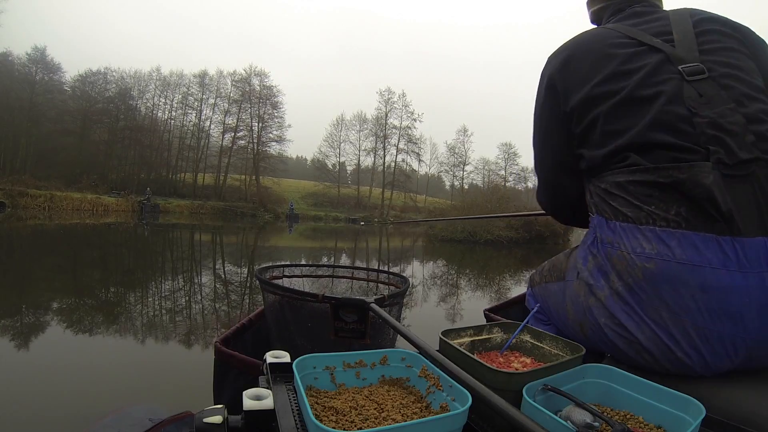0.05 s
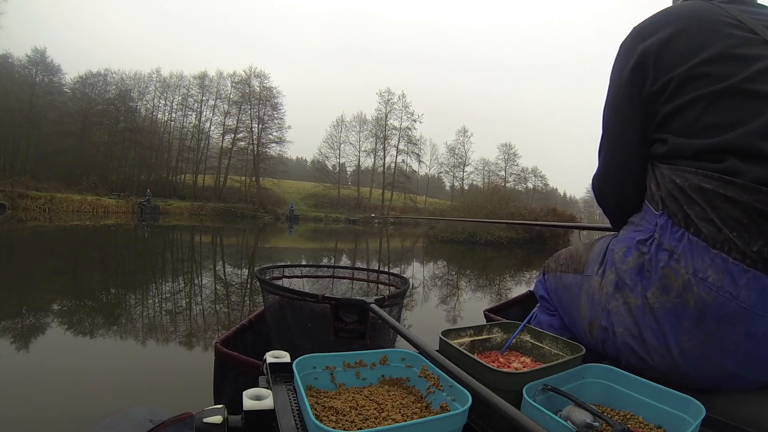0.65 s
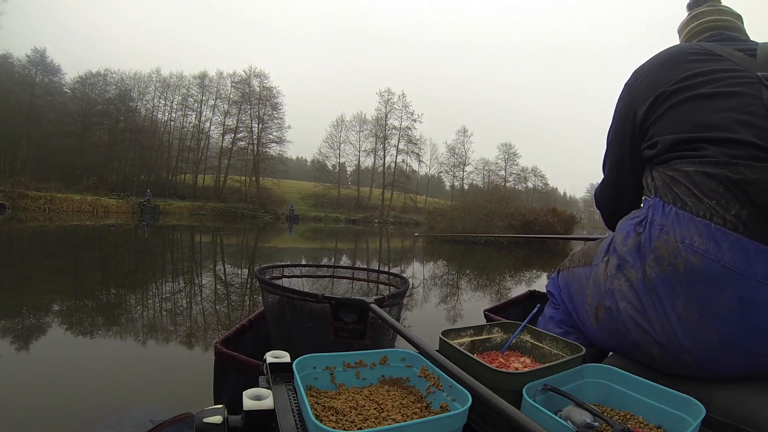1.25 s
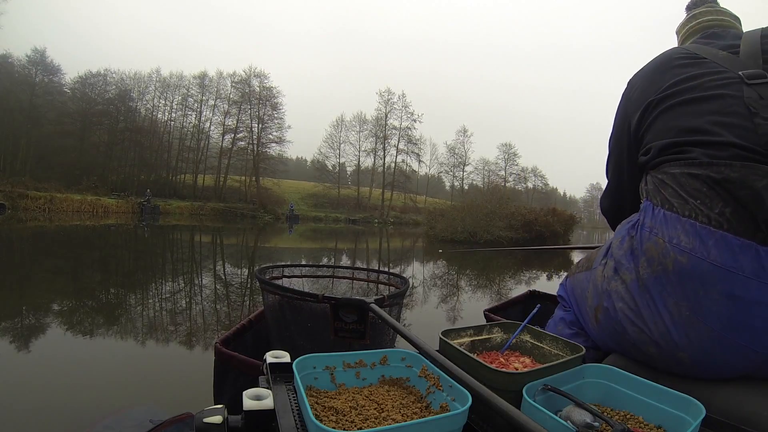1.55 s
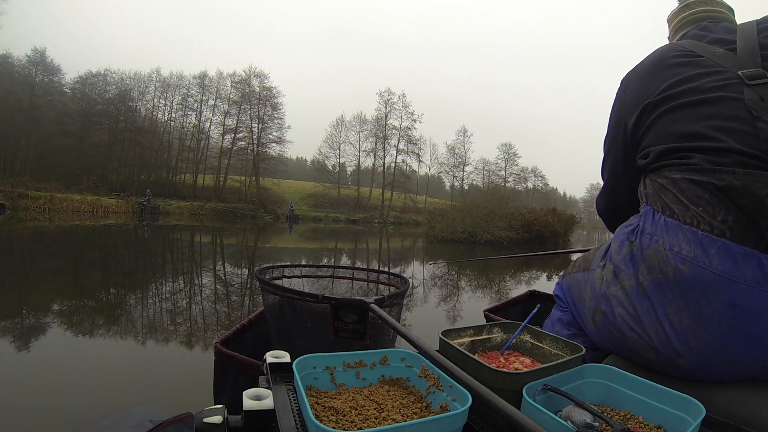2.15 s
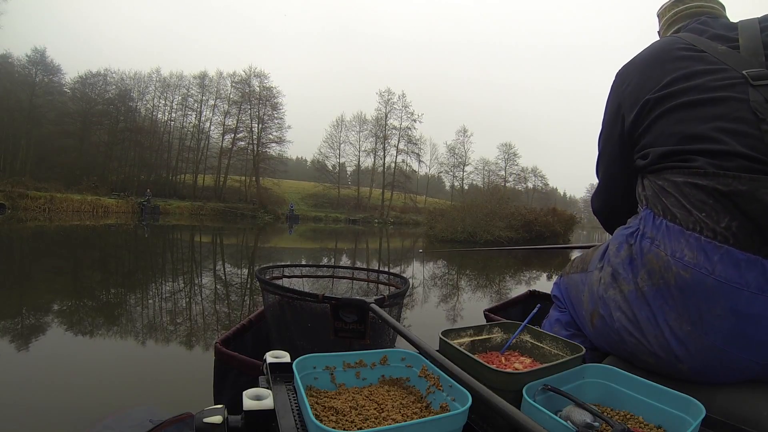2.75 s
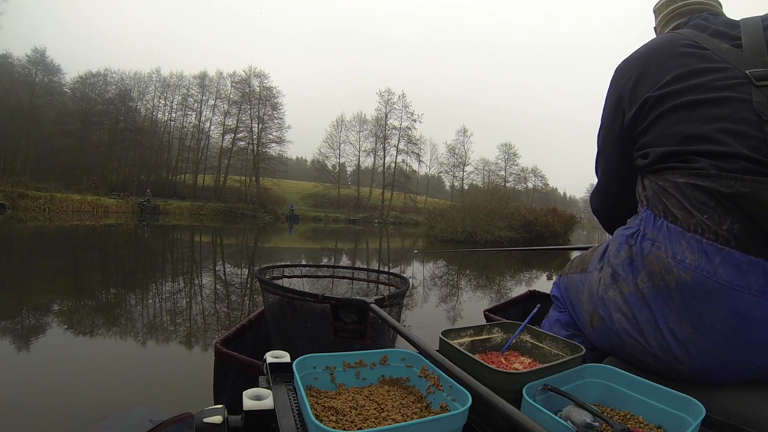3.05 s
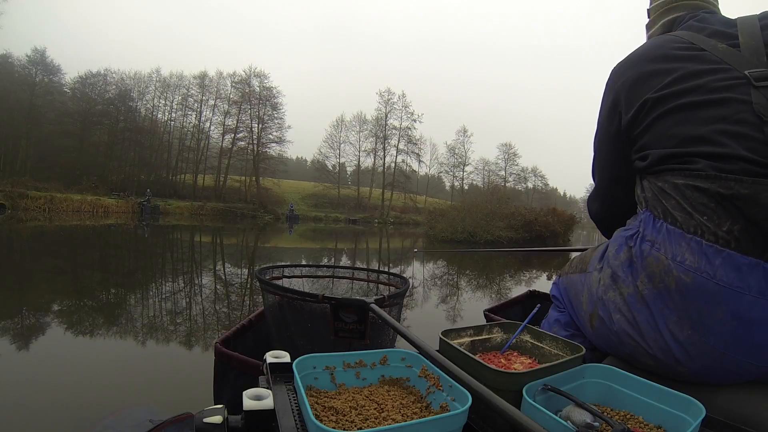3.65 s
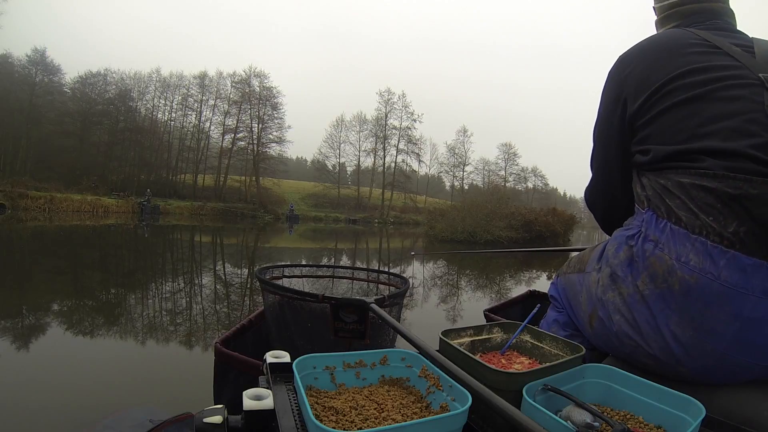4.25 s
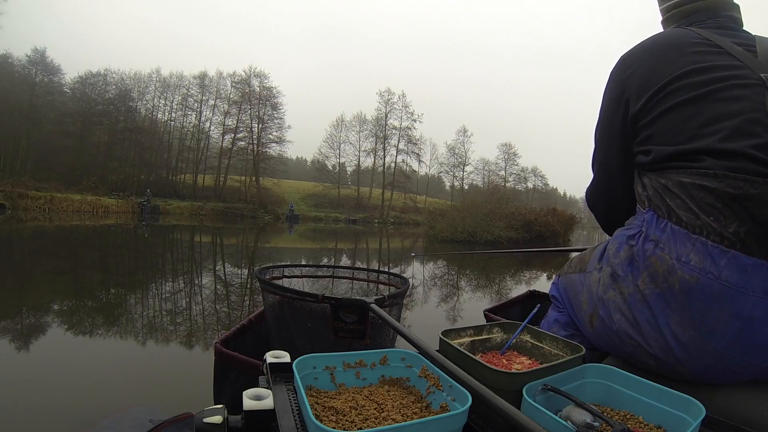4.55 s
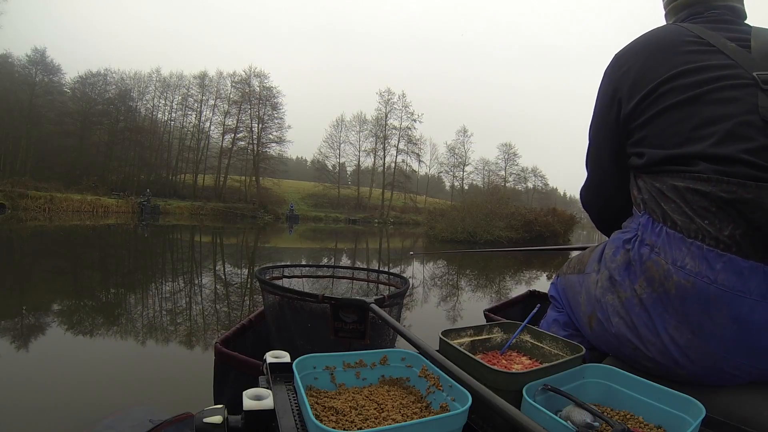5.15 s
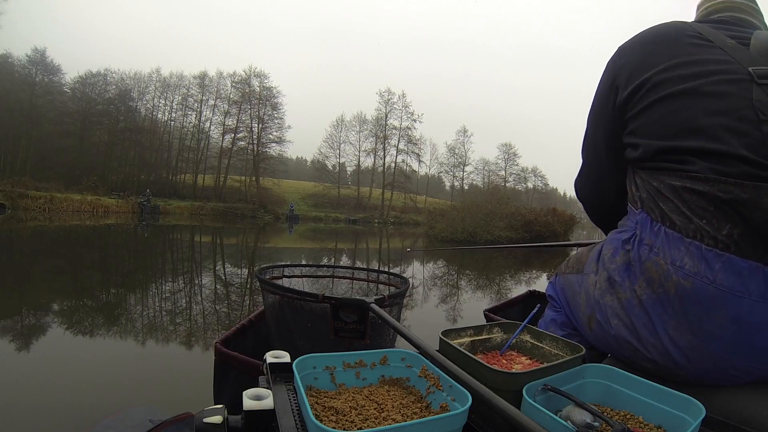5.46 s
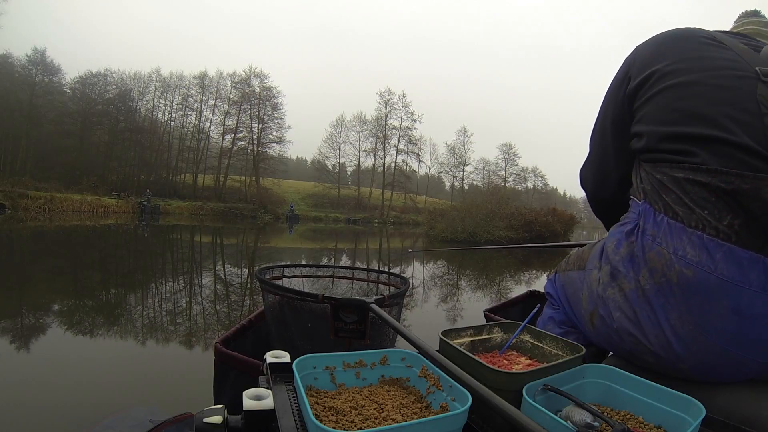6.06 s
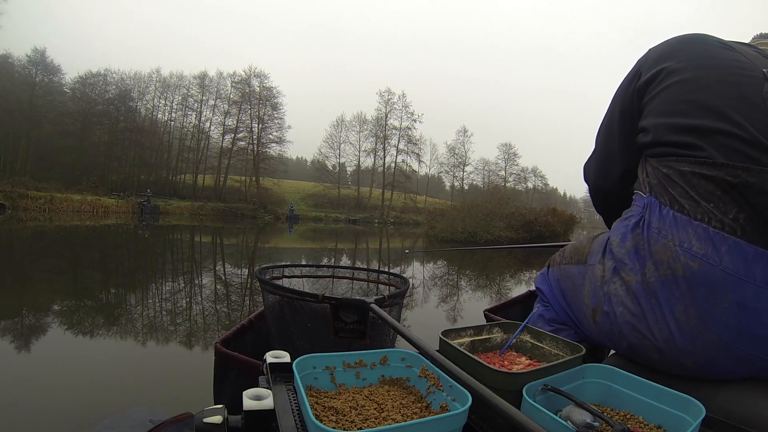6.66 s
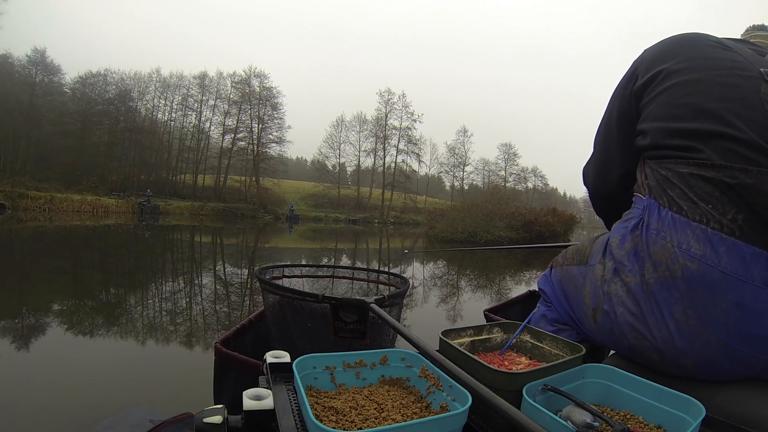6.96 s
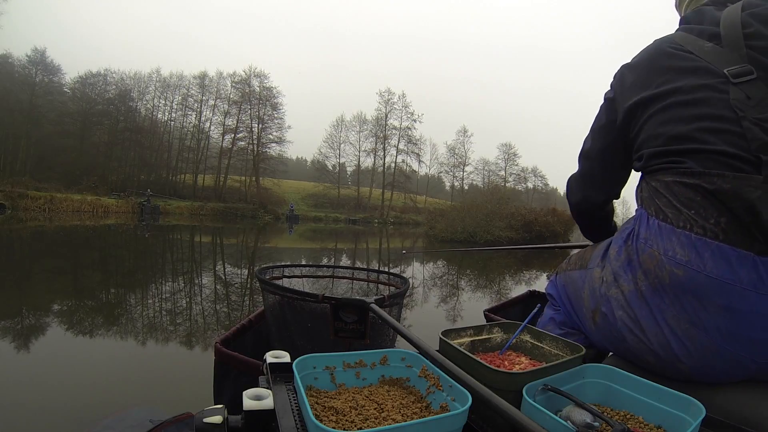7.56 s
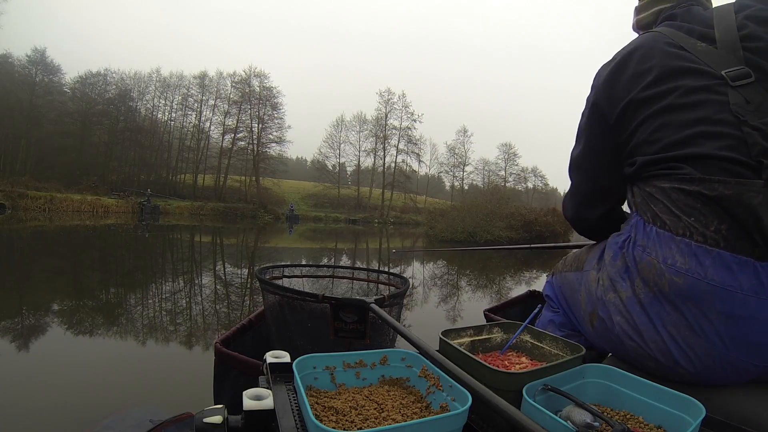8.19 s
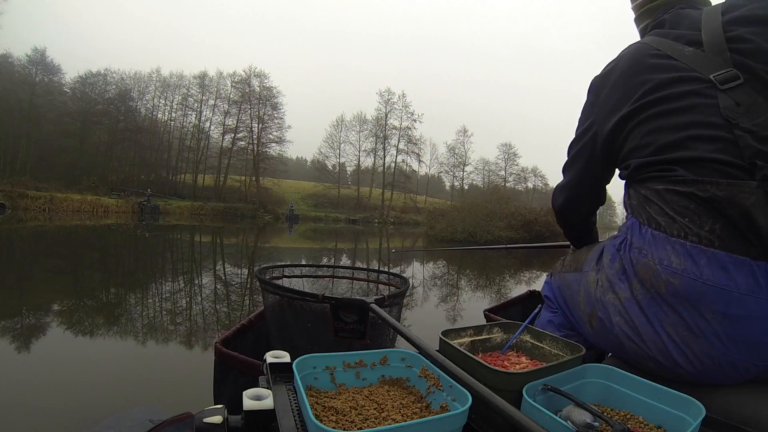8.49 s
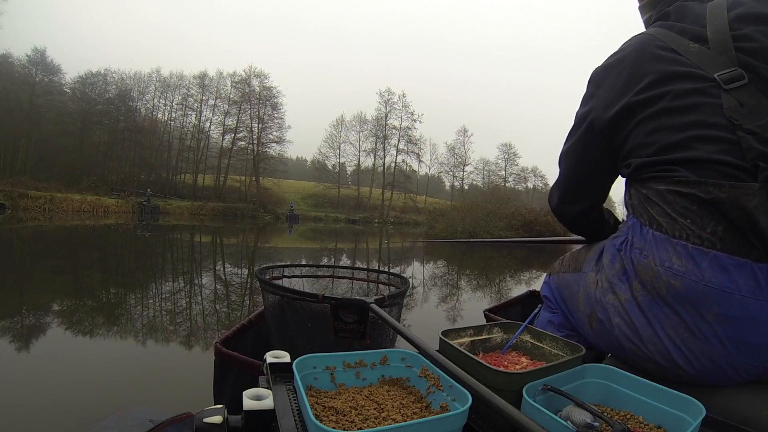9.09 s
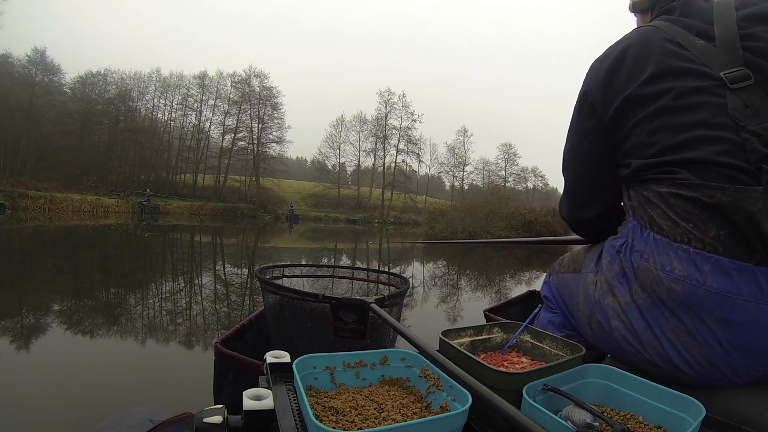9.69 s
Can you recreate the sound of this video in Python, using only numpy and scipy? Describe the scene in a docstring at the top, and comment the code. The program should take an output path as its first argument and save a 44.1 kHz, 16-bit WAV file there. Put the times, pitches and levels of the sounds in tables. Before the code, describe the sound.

A fishing seatbox booms, knocks and creaks as a long carbon pole rubs and clacks through the hands, over faint hiss.

```python
"""A seatbox booms, knocks and creaks under an angler who feeds a long carbon pole through his hands.
Its frame is a mass on springy legs and its trays are damped resonators, driven by his weight and by bumps.
Friction and impact excite the modes of the hollow pole: it rubs, its sections clack and a joint ticks.
A sleeve swishes over faint hiss. The microphone is fixed to the box, beside a still lake with no echo."""
import sys
import numpy as np
from scipy import signal
from scipy.fft import rfft, irfft, next_fast_len
from scipy.io import wavfile
from scipy.ndimage import uniform_filter1d

SR = 44100
rng = np.random.default_rng(int(sys.argv[2]) if len(sys.argv) > 2 else 0)


def store_wav(level_fs):
    """Save 16-bit WAV to argv[1]."""
    pcm = np.round(np.clip(np.atleast_2d(level_fs), -1, 1) * 32767)
    wavfile.write(sys.argv[1], SR, pcm.T.astype(np.int16))


N = 433490
TIME = np.arange(N) / SR
BLOW_TIME = TIME[:SR // 2]

# modes of the trays, the tube and its joint: (frequency [Hz], relative level [dB], T60 [s])
TRAY_MODES = [(116.2, -28.5, 0.66), (151.4, -14, 0.27), (184.2, -8, 0.25), (205.7, -9.5, 0.32),
              (256, -6.5, 0.3), (299.2, -0.5, 0.12), (330.7, 1.5, 0.1), (366.6, 2, 0.052),
              (457, 5.5, 0.0073), (533, -14.5, 0.11), (629.2, -16.5, 0.19), (697, -32, 0.39)]
TUBE_MODES = [(906, -10, 0.11), (1140, -4, 0.055), (1205, -11, 0.057), (1389, -3.5, 0.087),
              (1433, -4.5, 0.073), (1543, 3.5, 0.057), (1676, 0, 0.045), (1735, -1.5, 0.062),
              (1828, -12, 0.18), (1896, -16.5, 0.069), (2140, -7, 0.034), (2460, -8, 0.0088),
              (2650, -26.5, 0.021), (2810, -23.5, .02)]
JOINT_MODES = [(1663, 15.5, 0.0046), (1852, 5, 0.037), (2243, -11.5, 0.044), (2480, -5, 0.0063),
               (2598, 2.5, 0.039), (2750, -0.5, 0.026), (2910, -2.5, 0.012)]
# his shifting weight: (time [s], relative sway level [dB], relative creak level [dB])
WEIGHT_SHIFTS = [(0.0, -27, -46), (0.24, -44, -50), (0.76, -41, -51.5), (1.12, -39, -48),
                 (2.14, -49.5, -59.5), (2.54, -59, -75.5), (3.59, -65, -75), (4.16, -53.5, -72),
                 (4.35, -32, -59), (4.73, -46, -54), (4.9, -35, -54.5), (5.64, -42, -47.5),
                 (5.86, -47, -60.5), (6.41, -50, -59.5), (6.92, -35, -47.5), (7.42, -45, -64),
                 (8.08, -56.5, -67), (9.83, -54, -67.5)]
# bumps on the box: (time [s], frame drive [dB], tray drive [dB], pole drive [dB],
# swell of the load [s], chatter [s], frequency favoured in the trays [Hz])
BOX_BUMPS = [(0.028, -30, -38.5, -66, 0.042, 0.0084, 287), (0.137, -42, -44, -76, 0.018, 0.0022, 386),
             (0.18, -31, -38.5, -64, 0.011, .006, 295), (0.292, -51, -36.5, -69, 0.016, 0.013, 290),
             (0.449, -28.5, -44, -80, 0.036, 0.002, 323), (0.687, -25.5, -58, -55, 0.021, 0.0037, 300),
             (1.046, -24.5, -39.5, -46, 0.073, 0.019, 322), (1.175, -28, -40.5, -69, 0.017, 0.016, 303),
             (1.549, -44, -43, -59, 0.011, 0.0077, 210), (1.756, -44, -44, -69, 0.034, 0.023, 265.5),
             (4.17, -13.5, -21.5, -33.5, 0.025, 0.0028, 350), (4.309, -28, -24.5, -45, 0.049, 0.0025, 347),
             (4.369, -16, -49, -51.5, .02, 0.0038, 152), (4.735, -11.5, -28, -43.5, 0.021, 0.0076, 188),
             (4.772, -12, -30.5, -51, 0.045, 0.01, 263), (4.822, -13, -40, -56, 0.017, 0.021, 265),
             (4.911, -28.5, -40, -73, 0.048, 0.0041, 327), (5.07, -21, -38.5, -66, 0.047, 0.01, 312),
             (5.289, -22, -33.5, -57, 0.023, 0.0036, 306), (5.609, -17.5, -42.5, -51.5, 0.029, 0.013, 207),
             (5.74, -55, -42.5, -58, .02, 0.0086, 350), (6.751, -20, -35.5, -53, 0.017, 0.0045, 298),
             (6.958, -14.5, -28, -35.5, 0.0096, 0.0017, 652), (6.973, -15, -29.5, -46, 0.031, 0.0087, 285),
             (7.049, -19.5, -44, -61, .013, 0.011, 249), (8.793, -41, -56, -62.5, 0.02, 0.0046, 296),
             (9.5, -43, -51, -69, 0.0074, .0045, 220), (9.57, -39, -67, -75, .016, 0.0088, 294)]
REBOUND_S, REBOUND_CHATTER_S = 0.024, 0.014  # trays and pole lift at a bump and drop back


def frame():
    """Mass on a spring: the legs sway under shifting weight, boom at each bump and swing on after it."""
    # spectrum of the sway: (frequency [Hz], relative level [dB])
    sway_spectrum = [(15, -79.5), (27, -11.5), (41, 11), (52, -8.5), (62, 6), (78, -22), (100, -21.5),
                     (150, -30), (300, -78)]
    sway = coloured(rng.standard_normal(N), sway_spectrum)
    power = gain_of(follow(WEIGHT_SHIFTS)[0] + 3.5) ** 2
    power += sum(settling(s + swell, db - 15, t60=0.82) ** 2 for s, db, _, _, swell, _, _ in BOX_BUMPS)
    out = np.sqrt(power) * sway / running_rms(sway, size=6000)
    for s, db, _, _, swell, _, _ in BOX_BUMPS:
        hz = 49.67 * (0.0228 / swell) ** 0.292  # a slower load swings the frame lower
        progress = BLOW_TIME / swell
        load = (progress * np.exp(1 - progress)) ** 1.56
        add(out, s, gain_of(db) * load * np.sin(2 * np.pi * hz * BLOW_TIME))
    return out


def trays(rub_power):
    """Stick-slip and impact: the trays creak under load, knock at each bump and drop back, duller."""
    slips = fitful(grains(per_s=710, spread_db=2.5), depth_db=4, size=1200)
    creak = favour(ring(slips, TRAY_MODES), hz=233, octaves=1.8)
    power = gain_of(follow(WEIGHT_SHIFTS)[1] - 2.5) ** 2
    power += gain_of(0.5) ** 2 * rub_power  # rubbing passes down through his body
    power += sum(settling(s, db - 8, t60=0.39) ** 2 for s, _, db, *_ in BOX_BUMPS)
    out = np.sqrt(power) * creak / running_rms(creak, size=9000)
    for s, _, db, _, _, chatter_s, hz in BOX_BUMPS:
        rebound_db = -31 + 0.9 * (db + 24.5)  # harder bumps throw the trays higher
        add(out, s, knock(db, chatter_s, hz))
        add(out, s + REBOUND_S, knock(rebound_db, REBOUND_CHATTER_S, hz=145.7))
    return soft_mount(soft_mount(out, hz=730), hz=1000)


def knock(db, chatter_s, hz):
    """Impact excitation: a blow gives a narrow-band tock and rings the modes of the trays."""
    force = contact(chatter_s, chatter=110 * chatter_s)
    tock = evened(favour(force, hz, octaves=0.082))
    ringing = evened(favour(ring(force, TRAY_MODES, in_step=True), hz, octaves=0.77))
    return peaked(gain_of(-5) * tock + ringing, db)


def pole(tube_power, catch_power):
    """Friction and impact drive the tube's modes: it rubs in the hands, clacks and jumps at each bump."""
    # sections striking: (time [s], level before the mount [dB], chatter [s], favoured frequency [Hz])
    clacks = [(0.335, -51.5, 0.014, 2000), (0.869, -54, 0.0014, 1710), (1.063, -28.5, 0.0023, 1840),
              (1.125, -43, 0.0037, 1820), (1.149, -39, 0.0024, 1320), (1.624, -55.5, .003, 2600),
              (1.861, -51, 0.0022, 3140), (4.026, -65, .004, 1730), (4.295, -40, 0.0078, 1370),
              (4.309, -40, 0.0037, 1090), (4.799, -42, 0.0037, 1510), (5.865, -48, 0.0026, 1500),
              (6.493, -51, 0.011, 1250), (6.621, -53, 0.0071, 1100), (6.956, -59.5, 0.0043, 4940),
              (6.959, -30.5, 0.0021, 1500), (7.297, -55, 0.0054, 2080), (8.182, -61, .003, 1800),
              (8.244, -58.5, 0.0056, 1590), (9.283, -59.5, .0074, 1440)]
    slips = fitful(grains(per_s=2600, spread_db=3.5), depth_db=2, size=700)
    gripped_modes = [(hz, db, t60 * 0.42) for hz, db, t60 in TUBE_MODES]  # the hands add damping
    tube = evened(favour(ring(slips, gripped_modes), hz=1770, octaves=0.89))
    catches = fitful(ring(slips, JOINT_MODES), depth_db=2.5, size=600)
    # the pole also stirs in his grip as the box creaks
    grip_power = gain_of(-36.5 + 0.59 * follow(WEIGHT_SHIFTS)[1]) ** 2
    joint_share, jolt_hz = 0.21, 1355
    out = np.sqrt(tube_power + (1 - joint_share) * grip_power) * tube
    out += np.sqrt(catch_power + joint_share * grip_power) * catches
    for s, db, chatter_s, hz in clacks:
        add(out, s, clack(db, chatter_s, hz))
    for s, _, _, db, _, chatter_s, _ in BOX_BUMPS:
        add(out, s, clack(db, chatter_s, jolt_hz))
        add(out, s + REBOUND_S, clack(db - 14.5, REBOUND_CHATTER_S, jolt_hz))
    return soft_mount(out, hz=5000)


def clack(db, chatter_s, hz):
    """Contact time sets timbre: a brief blow rings the tube cleanly, a long one rattles."""
    # (frequency [Hz], relative level [dB])
    rattle_spectrum = [(300, -14), (700, 3.5), (1100, -0.5), (2000, -7), (3000, -8.5),
                       (4000, -19.5), (5500, -19), (9000, -30)]
    ringing = evened(ring(contact(chatter_s, chatter=260 * chatter_s), TUBE_MODES))
    rattle = coloured(noise_burst(chatter_s + 0.0067), rattle_spectrum)
    rattle_db = -0.5 + 3.5 * np.log2(chatter_s / 0.0054)
    return peaked(favour(ringing + gain_of(rattle_db) * rattle, hz, octaves=0.43), db)


def rubbing():
    """Sliding friction: each stroke's power grows as the grip tightens, shared by tube and joint."""
    # strokes through the hands: (start [s], length [s], final level [dB], share at the joint [0-1])
    strokes = [(0.177, 0.2, -54.5, 0.68), (0.947, 0.14, -47, 0.01), (1.112, 0.26, -60, 0.16),
               (1.665, 0.1, -58.5, 0.66), (2.463, 0.031, -65.5, 0.3), (4.127, .11, -57.5, 0.22),
               (4.446, 0.084, -61, 0), (4.72, 0.097, -53, 0.08), (5.286, .2, -60, 0.17),
               (5.604, 0.074, -63, 0.1), (6.202, 0.043, -58, 0.1), (6.454, 0.25, -61, 0.06),
               (6.995, 0.16, -62, 0.08), (7.303, 0.053, -56, 0.44), (9.083, 0.15, -66.5, 0.1)]
    attack_s, release_s, press_db = 0.0094, 0.01, 3.5
    tube_power, catch_power = np.zeros((2, N))
    for start, length, db, share in strokes:
        t = TIME - start
        attack = np.clip(t / attack_s, 0, 1)
        pressure = gain_of(db + press_db * (np.clip(t / length, 0, 1) - 1))
        release = np.exp(-np.maximum(t - length, 0) / release_s)
        power = (attack * pressure * release) ** 2
        tube_power += (1 - share) * power
        catch_power += share * power
    return tube_power, catch_power


def joint():
    """Stick-slip: a loaded joint lets go in runs of bright ticks, each at a slightly different pitch."""
    # runs of ticks: (start [s], length [s], interval [s], level of the first tick [dB])
    runs = [(1.206, .3, .0655, -52), (4.841, .23, .04, -56.5), (5.577, .1, 0.038, -56.5),
            (5.785, .14, .039, -53.5)]
    rise_db_per_s, alternate_tick_db = 1, -5
    out = np.zeros(N)
    for start, length, interval, first_db in runs:
        for k, t in enumerate(np.arange(0, length, interval)):
            detune = 1 + 0.008 * rng.standard_normal()
            modes = [(hz * detune, db, t60) for hz, db, t60 in JOINT_MODES]
            tick = favour(ring(contact(0.003, chatter=4.2), modes), hz=2400, octaves=0.88)
            add(out, start + t, peaked(tick, first_db + rise_db_per_s * t + alternate_tick_db * (k % 2)))
    return out


def sleeve():
    """Friction noise: fabric brushes fabric, louder with the speed of the arm."""
    # reaches of the arm: (centre time [s], level [dB], half-width [s])
    swishes = [(2.465, -72, 0.089), (7.53, -63, 0.12), (7.796, -68, 0.023), (7.964, -71.5, 0.087),
               (8.412, -62.5, 0.063), (8.58, -71, 0.13), (8.824, -73.5, 0.098), (9.184, -64.5, 0.15),
               (9.63, -72.5, 0.13)]
    # spectrum of the fabric: (frequency [Hz], relative level [dB])
    cloth_spectrum = [(1000, -44), (1280, -5), (1420, 6.5), (1600, -3.5), (1850, -1.5), (2300, -8.5),
                      (3200, 1), (4000, -13), (5500, -17), (7000, -20), (8000, -20), (9500, -31)]
    speed = sum(gain_of(db) * np.exp(-((TIME - s) / half) ** 2) for s, db, half in swishes)
    return speed * coloured(grains(per_s=13000, spread_db=5), cloth_spectrum)


def background():
    """Noise floor: broadband hiss of air and microphone, with narrow bands of electronic whine."""
    # spectrum of the hiss: (frequency [Hz], relative level [dB])
    hiss_spectrum = [(30, 3.5), (60, 0.5), (100, -4), (200, -8), (400, -13.5), (700, -16.5), (1200, -20),
                     (1550, -19.5), (2100, -22), (3000, -22.5), (4000, -26), (7000, -31.5), (11000, -37.5),
                     (15000, -37.5)]
    # bands of whine: (frequency [Hz], width [Hz], level [dB])
    whine_bands = [(2990, 18, -89), (5077, 240, -83), (10070, 730, -88), (12670, 30, -97),
                   (12480, 510, -89.5)]
    size = next_fast_len(N)
    hz = np.fft.rfftfreq(size, 1 / SR)
    bands = sum(gain_of(db) * evened(np.exp(-2 * ((hz - f) / width) ** 2)) for f, width, db in whine_bands)
    whine = irfft(rfft(rng.standard_normal(size)) * bands)[:N]
    return gain_of(-60.5) * coloured(rng.standard_normal(N), hiss_spectrum) + whine


def ring(force, modes, in_step=False):
    """Modal superposition: damped modes start in step near the blow, with alternating signs far off."""
    sign = 1 if in_step else -1
    response = sum(sign ** k * gain_of(db - 60 * BLOW_TIME / t60) * np.sin(2 * np.pi * hz * BLOW_TIME)
                   for k, (hz, db, t60) in enumerate(modes))
    return signal.fftconvolve(force, response)[:len(force)]


def contact(chatter_s, chatter):
    """Contact force: a unit impulse, then the loose surfaces chatter with the given relative strength."""
    force = noise_burst(chatter_s / 2)
    force *= chatter / np.linalg.norm(force)
    force[0] += 1
    return force


def noise_burst(decay_s):
    """White noise with a quick rise and an exponential decay."""
    return rng.standard_normal(len(BLOW_TIME)) * np.sqrt(BLOW_TIME) * np.exp(-BLOW_TIME / decay_s)


def grains(per_s, spread_db):
    """Shot noise: tiny slips at random moments, a few of them large."""
    strength = gain_of(spread_db * np.minimum(rng.exponential(1, N), 4))
    return evened(strength * rng.standard_normal(N) * (rng.random(N) < per_s / SR))


def fitful(x, depth_db, size):
    """Amplitude modulation: rubbing comes in scuffs as the pressure wavers over about size samples."""
    wander = evened(uniform_filter1d(uniform_filter1d(rng.standard_normal(N), size), size))
    return evened(x * gain_of(depth_db * np.tanh(wander)))


def settling(s, db, t60, build_s=0.0067):
    """Damped decay: an envelope that builds from time s and dies exponentially."""
    t = np.maximum(TIME - s, 0)
    return np.minimum(t / build_s, 1) * gain_of(db - 60 * t / t60)


def favour(x, hz, octaves):
    """Selective excitation: where and how hard a blow lands picks the band it wakes, octaves each way."""
    edges = np.minimum(hz * 2 ** (octaves * np.array([-1, 1])), SR * 0.45)
    band = signal.butter(1, edges, "bandpass", fs=SR, output="sos")
    return signal.sosfilt(band, signal.sosfilt(band, x))


def soft_mount(x, hz):
    """Vibration isolation: a soft mount passes little treble on to the microphone."""
    return signal.sosfilt(signal.butter(2, hz, fs=SR, output="sos"), x)


def coloured(x, spectrum):
    """Spectral shaping: filters x by a curve over log frequency, at rms 1."""
    hz, db = np.transpose(spectrum)
    size = next_fast_len(len(x))
    shape_db = np.interp(np.log(np.fft.rfftfreq(size, 1 / SR) + 1), np.log(hz), db)
    return evened(irfft(rfft(x, size) * gain_of(shape_db), size)[:len(x)])


def gain_of(db):
    """Decibels to amplitude."""
    return 10 ** (np.asarray(db) / 20)


def evened(x):
    """Normalisation to rms 1."""
    return x / np.sqrt(np.mean(x ** 2) + 1e-20)


def running_rms(x, size):
    """Rms over a moving window of samples."""
    return np.sqrt(abs(uniform_filter1d(x ** 2, size, mode="constant")) + 1e-20)


def peaked(x, db):
    """Normalisation of a blow by its highest short-time rms."""
    return gain_of(db) * x / running_rms(x, size=128).max()


def follow(rows):
    """Linear interpolation of each column over time."""
    times, *columns = np.transpose(rows)
    return [np.interp(TIME, times, column) for column in columns]


def add(mix, s, sound):
    """Superposition of a sound at time s."""
    part = mix[max(round(s * SR), 0):][:len(sound)]
    part += sound[:len(part)]


def scene():
    """Free field: all sources sum at one microphone, with no echo over the open water."""
    tube_power, catch_power = rubbing()
    seatbox = frame() + trays(tube_power + catch_power)
    return (seatbox + pole(tube_power, catch_power) + sleeve() + background() + joint())[None]


def record(dry):
    """Band limiting: the recorder cuts the highest treble."""
    edge_hz = 15300
    lowpass = signal.firwin(511, edge_hz, window=("kaiser", 9), fs=SR)
    return signal.oaconvolve(dry, lowpass[None], "same")


dry = scene()
out = record(dry)
store_wav(out)
```